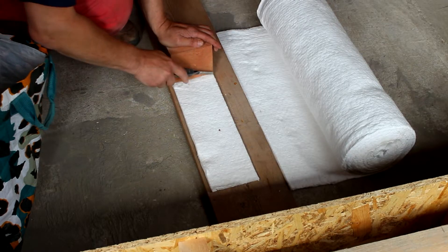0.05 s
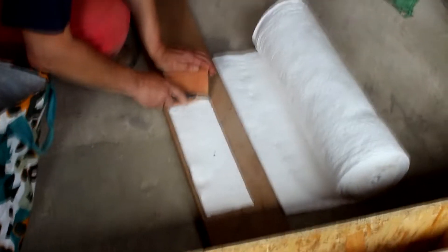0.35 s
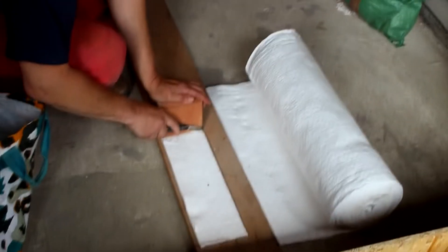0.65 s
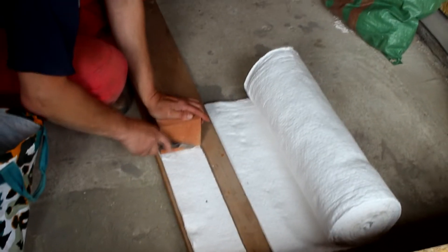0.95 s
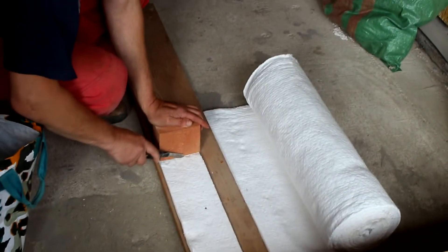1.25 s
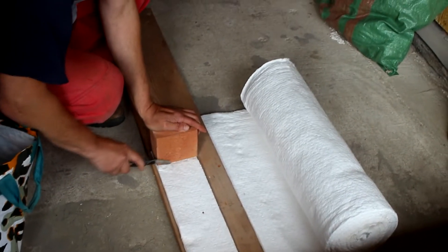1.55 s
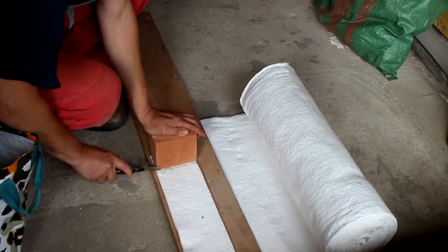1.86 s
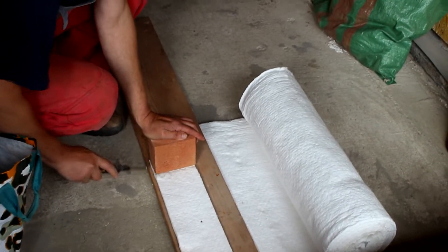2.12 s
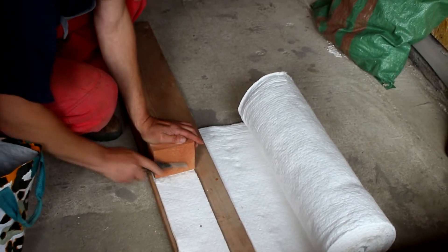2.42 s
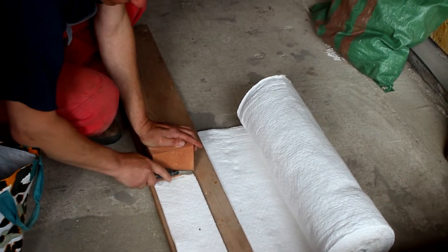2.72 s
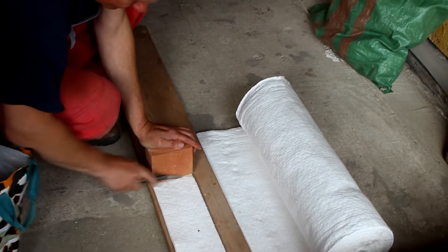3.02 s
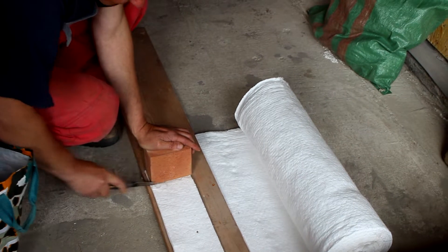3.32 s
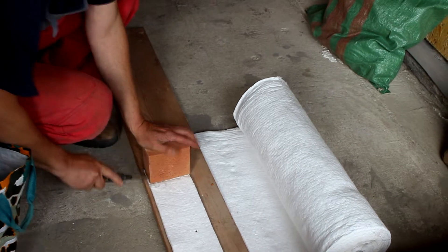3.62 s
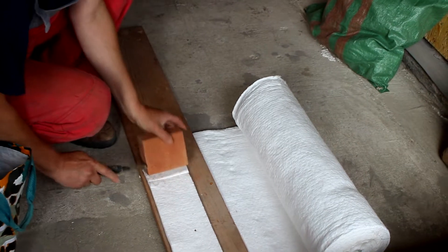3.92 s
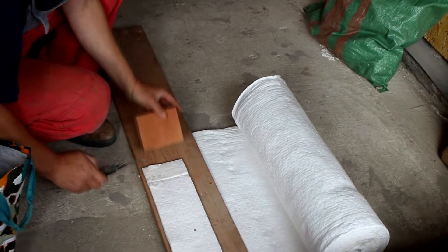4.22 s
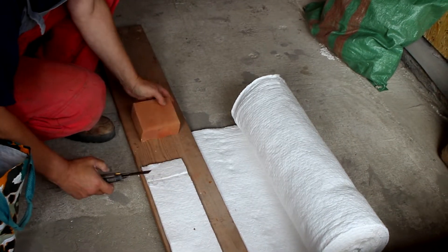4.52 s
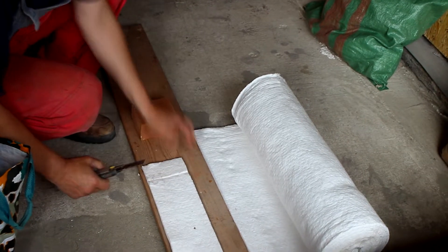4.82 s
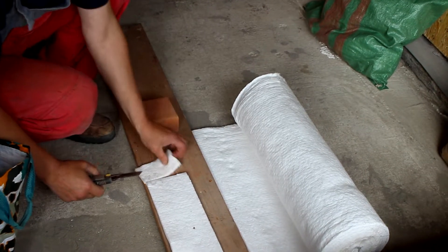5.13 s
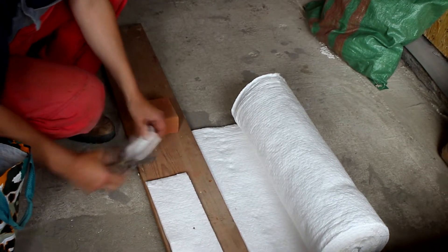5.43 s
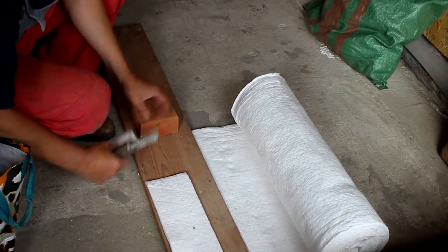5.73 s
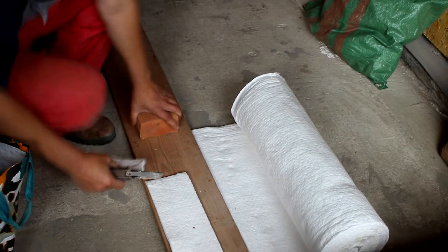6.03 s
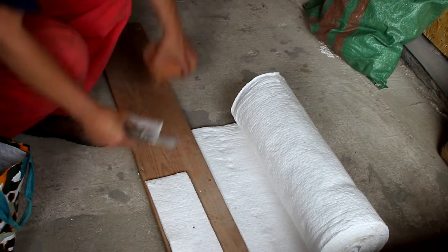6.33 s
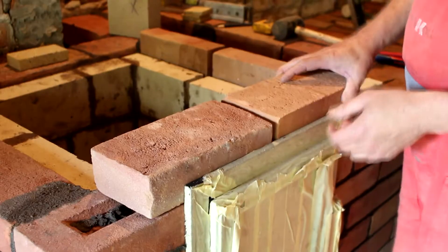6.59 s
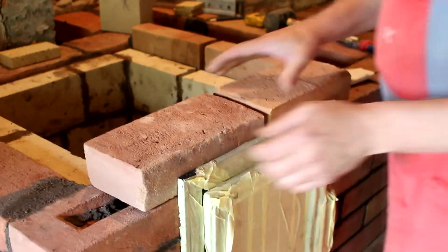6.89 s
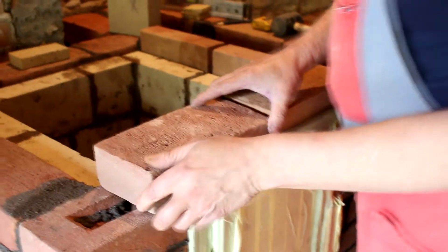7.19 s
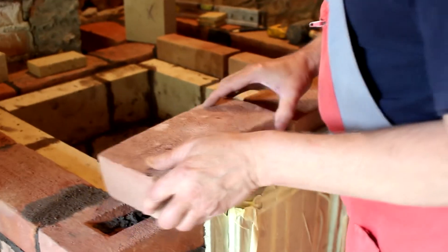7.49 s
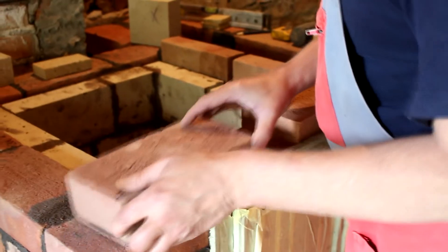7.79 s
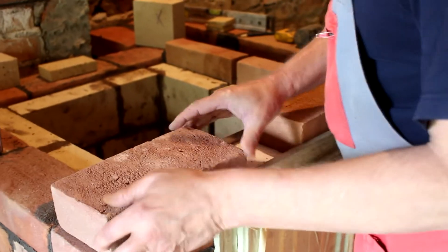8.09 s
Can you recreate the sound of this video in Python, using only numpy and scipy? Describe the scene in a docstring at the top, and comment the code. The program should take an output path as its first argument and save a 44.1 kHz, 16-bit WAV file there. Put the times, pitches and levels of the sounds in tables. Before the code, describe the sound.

Quiet, gritty knife strokes tear through a fibre sheet, close by and a little to the left, with small ticks and thin squeaks where the blade rubs a brick. Then comes one loud, ringing knock of brick on a plank, with a quick rattle. A few faint scrapes follow before louder clay bricks slide over each other, with dull bumps and short clacks in a small room. Faint room noise continues underneath.

```python
"""In a workshop with a concrete floor, a knife saws through fibre insulation along a brick on a plank.
The fibres tear in tiny snaps while the steel blade hisses, scrapes and faintly squeals on the brick.
The brick knocks down on the plank, makes the wood ring and rocks to rest.
Then, in a smaller room, clay bricks grind, clack and bump as they are set on a half-built stove.
Soft room noise runs underneath, with a low rumble in the first second."""
import sys
import numpy as np
from scipy import signal
from scipy.io import wavfile

SR = 44100
rng = np.random.default_rng(int(sys.argv[2]) if len(sys.argv) > 2 else 0)


def store_pcm(level_fs):
    """Save levels as 16-bit WAV."""
    pcm = np.round(np.clip(level_fs, -1, 1) * 32767).astype(np.int16)
    wavfile.write(sys.argv[1], SR, np.atleast_2d(pcm).T)


N = 359415
TIME = np.arange(N) / SR
BINS = np.fft.rfftfreq(4096, 1 / SR)  # the frequencies at which filter curves are drawn
BITE_SHARE = 0.41  # part of each contact over which the pressure builds

# the tones a clay brick rings with: f/Hz, level/dB, t60/s (the time to fade by 60 dB)
BRICK_TONES = [(567, -3.5, 0.025), (704, 2.5, 0.031), (832, -3.5, 0.087), (960, -8, 0.013),
               (1676, -8, 0.13), (1987, -5.5, 0.086), (2220, -12, 0.024), (2746, -3.5, 0.06),
               (3250, -7, 0.16), (3683, 0, 0.059), (4335, 0, 0.04), (4300, -11, .08), (4740, -24, 0.22),
               (5640, -3, 0.19), (6000, -14, .07), (7300, -5, 0.053)]


def gain_of(db):
    """Turns decibels into a factor to multiply by."""
    return 10 ** (np.asarray(db) / 20)


def evened(x):
    """Scales a signal to an average power of 1."""
    return x / np.sqrt(np.mean(x ** 2) + 1e-20)


def read(points, hz=BINS):
    """Joins (frequency, value) points into a curve, with octaves evenly spaced."""
    f, value = np.transpose(points)
    return np.interp(np.log(hz + 1), np.log(f + 1), value)


def add(mix, s, sound):
    """Mixes a sound in, starting at s seconds."""
    part = mix[max(round(s * SR), 0):][:len(sound)]
    part += sound[:len(part)]


def causal(gain):
    """Turns a curve into a filter that never rings ahead of the sound (minimum phase)."""
    log_gain = np.log(np.maximum(np.r_[gain, gain[-2:0:-1]], 1e-5))
    spectrum = np.exp(np.conj(signal.hilbert(log_gain)))
    return np.fft.ifft(spectrum).real[:len(gain)]


def coloured(x, gain):
    """Shapes the tone with a curve; white noise keeps its power."""
    return signal.oaconvolve(x, causal(evened(gain)))[:len(x)]


def peak(hz, width):
    """The curve of one resonance: a hump around hz."""
    return 1 / np.hypot(1, 2 * (BINS - hz) / width)


def radiated(x, low_hz):
    """Cuts the bass: small things push little air below their lowest tone."""
    return signal.sosfilt(signal.butter(4, low_hz, "high", fs=SR, output="sos"), x)


def held(t, attack_s, hold_s, release_s):
    """A level that rises, holds until hold_s, then fades by 60 dB in release_s."""
    return np.clip(t / attack_s, 0, 1) * gain_of(-60 * np.maximum(t - hold_s, 0) / release_s)


def arch(start, length, sag_db):
    """A level that swells to 1 in mid-stroke and is sag_db lower at both ends."""
    return gain_of(-sag_db * np.minimum((2 * (TIME - start) / length - 1) ** 2, 20))


def waver(size, per_s, depth_db):
    """A level that drifts to a new random value per_s times a second."""
    knots = rng.standard_normal(size // 50)
    return gain_of(depth_db * np.interp(TIME[:size] * per_s, np.arange(len(knots)), knots))


def grit(size, per_s, spread_db):
    """A stream of tiny random cracks; spread_db makes their sizes unequal."""
    cracks = rng.random(size) < per_s / SR
    strength = gain_of(spread_db * np.minimum(rng.exponential(1, size), 4))
    direction = np.sign(rng.standard_normal(size))
    return evened(cracks * direction * strength)


def scrapes(rows, colour, release_s, ring_width_hz, per_s, spread_db, catch_db, crumbs_per_s):
    """Each scrape bites, sticks and slips over grains, then fades; where it touches sets the pitch."""
    out, t = np.zeros(N), TIME[:SR // 3]
    for s, length, db, hz, ring_db in rows:
        push = gain_of(db) * held(t, BITE_SHARE * length, length, release_s)
        sand = grit(len(t), per_s, spread_db) * waver(len(t), per_s=228, depth_db=catch_db)
        crumbs = gain_of(-5.5) * grit(len(t), crumbs_per_s, spread_db)
        grains = push * (sand + crumbs)
        grains *= np.linalg.norm(push) / np.linalg.norm(grains)  # the hand's push sets the energy
        ring = np.hypot(1, gain_of(ring_db) * peak(hz, ring_width_hz * np.sqrt(hz / 1000)))
        add(out, s, coloured(grains, colour * ring))
    return out


def blows(rows, tones, scatter, crack_db, crack_t60, travel_s):
    """Each blow rings an object's tones and crushes a little grit; soft blows lack treble."""
    out, t = np.zeros(N), TIME[:SR // 3]
    hz, tone_db, t60 = np.transpose(tones)[:, :, None]
    slowness = np.sqrt(1000 / hz)  # bending waves: the high tones arrive first
    age = np.maximum(t - travel_s * (slowness - slowness.min()), 0)
    for s, db, bright_hz in rows:
        pitch = hz * (1 + scatter * rng.standard_normal(hz.shape))
        ring = (gain_of(tone_db - 60 * age / t60) * np.sin(2 * np.pi * pitch * age)).sum(0)
        crack = gain_of(crack_db - 60 * t / crack_t60) * rng.standard_normal(len(t))
        sound = signal.lfilter(*signal.butter(2, min(bright_hz, SR / 3), fs=SR), ring + crack)
        crest = abs(signal.hilbert(sound)).max()
        add(out, s, gain_of(db) * sound / crest)
    return out


def stereo(mid, side):
    """Makes left and right from what they share (mid) and what sets them apart (side)."""
    # how wide the sound is: f/Hz, side level/dB
    width = [(40, -8.5), (130, -8), (600, -12.5), (1200, -10.5), (2400, -8.5), (4500, -6.5), (8000, -4.5),
             (14000, -5.5)]
    # how far it leans to the left: f/Hz, left over right/dB
    balance = [(60, 3), (250, 1.2), (1000, .6), (3000, 2.2), (6000, 1.6), (14000, 1.8)]
    side = signal.oaconvolve(side, causal(gain_of(read(width))))[:N]
    return np.array([signal.oaconvolve(mid + sign * side, causal(gain_of(sign * read(balance) / 2)))[:N]
                     for sign in (1, -1)])


def reflections(decay, build_s, shorter=1):
    """Random echoes off the walls build up, then fade at each frequency's own speed."""
    echoes = rng.choice([-1., 1.], SR) * (rng.random(SR) < .15)
    hz, t, bands = signal.stft(echoes, SR, nperseg=256)
    fade = gain_of(-60 * t * shorter / read(decay, hz)[:, None])
    tail = signal.istft(bands * fade, SR)[1]
    tail *= np.minimum(TIME[:len(tail)] / build_s, 1)
    return tail / np.linalg.norm(tail)


def room(x, decay, wet_db, build_s, side_db):
    """Adds a room's echoes to a sound; early ones from the sides make it wide."""
    angle = 2 * np.pi * TIME  # two sets of echoes trade places, so the tail has no steady ringing pitch
    tail = sum(signal.oaconvolve(x * share(angle), reflections(decay, build_s))[:N]
               for share in (np.sin, np.cos))
    early = signal.oaconvolve(x, reflections(decay, build_s=0.00047, shorter=2))[:N]
    return stereo(x + gain_of(wet_db) * tail, gain_of(side_db) * early)


def air():
    """Steady room noise from all around, and an uneven low rumble at the start."""
    # the tone of the room noise: f/Hz, level/dB
    noise_colour = [(15, -61), (25, -15.5), (59, -6.5), (107, -8), (129, -7), (289, -2.5), (567, -5),
                    (648, -7.5), (703, -5), (1140, -9), (2060, -12.5), (2230, -13), (3170, -16),
                    (3530, -16), (15500, -32)]
    mid, side = (coloured(rng.standard_normal(N), gain_of(read(noise_colour))) for _ in range(2))
    nudges = held(TIME, attack_s=.01, hold_s=0.89, release_s=.8) * waver(N, per_s=21, depth_db=6.5)
    rumble = np.array([coloured(rng.standard_normal(N), peak(68, 83) ** 3) for _ in range(2)])
    steady = gain_of(-55) * stereo(mid, side * gain_of(7.5))
    return steady + rumble * nudges * gain_of([[-57.5], [-62.5]])


def brick_bumps():
    """A brick lands with a dull bump, first on the plank, later on the stove."""
    # the landings: t/s, level/dB, treble limit/Hz
    bumps = [(4.42, -30, 450), (4.435, -29.5, 700), (4.488, -34, 320), (6.645, -24, 190),
             (6.818, -40.5, 250), (6.96, -33.5, 350), (7.126, -41.5, 300), (7.454, -26.5, 300),
             (7.494, -22, 400), (7.537, -28, 320), (7.648, -17, 340), (7.683, -17, 450), (7.728, -31, 200),
             (7.814, -16.5, 227), (7.865, -17.5, 260), (7.918, -25.5, 260), (8.08, -18.5, 229)]
    # the low tones of what carries the brick: f/Hz, level/dB, t60/s
    support_tones = [(133, -5.5, 0.13), (150, -5, 0.19), (175.7, 6, 0.086), (257, 3.5, 0.1),
                     (313, -1.5, 0.19), (533, -4, 0.082)]
    thuds = blows(bumps, support_tones, scatter=0.048, crack_db=-4, crack_t60=0.039, travel_s=0.0022)
    return radiated(thuds, low_hz=134.4)


def brick_ringing():
    """The curve by which a brick boosts its own tones whenever a grain cracks on it."""
    power = sum((gain_of(8 + db / 2) * peak(hz, 2.2 / t60)) ** 2 for hz, db, t60 in BRICK_TONES)
    return np.sqrt(1 + power)


def brick_drag(start_s=6.99, length_s=0.57, growth_db_per_s=32):
    """Brick grinds over brick, pushed steadily harder until it stops."""
    # the tone of the grinding: f/Hz, level/dB
    drag_colour = [(59, -39), (100, -20), (304, -2), (352, -13), (407, -3.5), (513, -20), (570, -8),
                   (780, -14.5), (942, -12), (1460, -6), (1880, -8.5), (4090, -19), (15000, -37.5)]
    grinding = grit(N, per_s=3500, spread_db=2.5) * waver(N, per_s=70, depth_db=2)
    t = TIME - start_s
    push = gain_of(-57 + growth_db_per_s * np.clip(t, 0, length_s))
    contact = held(t, attack_s=.03, hold_s=length_s, release_s=0.034)
    return push * contact * coloured(grinding, brick_ringing() * gain_of(read(drag_colour)))


def brick_slips():
    """Clay slips over clay in short, gritty bursts."""
    # the slips: t/s, length/s, level/dB, ring f/Hz, ring boost/dB
    slips = [(6.589, 0.021, -30.5, 2230, 15), (6.612, 0.019, -32, 8260, 10), (6.812, 0.0034, -42, 1110, 28),
             (6.962, .012, -40, 1860, 23), (6.986, 0.015, -39.5, 1380, 23.5), (7.331, 0.018, -37, 1580, 19),
             (7.44, 0.028, -35.5, 1690, 19), (7.47, 0.016, -28.5, 520, 30), (7.535, 0.0088, -34.5, 590, 40),
             (7.635, 0.022, -27.5, 2270, 9.5), (7.682, 0.025, -21.5, 3970, 3.5),
             (7.703, 0.013, -24.5, 1730, 23), (7.847, 0.012, -31, 650, 33), (7.914, .006, -36, 3830, 11),
             (7.946, 0.0031, -28, 7250, 12)]
    # the tone of crushed clay grit: f/Hz, level/dB
    clay_grit = [(120, -5.5), (400, 1.5), (750, -11.5), (1200, -2), (1900, -2), (3000, 4.5), (4200, 1),
                 (5500, 1.5), (8000, -3.5), (11000, -8), (16000, -17)]
    return scrapes(slips, brick_ringing() * gain_of(read(clay_grit)), release_s=.15, ring_width_hz=160,
                   per_s=4500, spread_db=2, catch_db=0, crumbs_per_s=200)


def brick_clacks():
    """Bricks hit each other and ring briefly."""
    # the hits: t/s, level/dB, treble limit/Hz
    clacks = [(6.8135, -30, 1750), (6.968, -30.5, 1520), (7.1235, -34.5, 1420), (7.257, -39, 3000),
              (7.334, -28, 2000), (7.66, -20, 900), (7.72, -13.5, 1490), (7.948, -17.5, 1840),
              (8.144, -12, 860)]
    return blows(clacks, BRICK_TONES, scatter=0.017, crack_db=4, crack_t60=0.11, travel_s=0.00195)


def rocking(start_s=4.691, first_gap_s=.041, shrink=0.71, loss_db=3.5, bright_hz=850):
    """Lists the blows of the dropped brick rocking to rest, each sooner and weaker."""
    gaps = first_gap_s * shrink ** np.arange(4)
    times = start_s + np.r_[0, np.cumsum(gaps)]
    return [(s, -9.5 - loss_db * bounce, bright_hz) for bounce, s in enumerate(times)]


def plank_knocks():
    """The brick knocks on the plank and the wood rings."""
    # the knocks: t/s, level/dB, treble limit/Hz
    knocks = [(3.62, -40.5, 890), (3.889, -39.5, 900), (4.227, -41.5, 1000), (4.439, -29.5, 2470),
              (4.494, -29, 2240), (4.506, -31, 2000), (4.548, -35, 885), (4.675, -26, 1000),
              (4.6793, -0.5, 3500), (4.6835, -12.5, 1300), (4.914, -33.5, 1100), (6.106, -36, 3000)]
    # the plank's own tones: f/Hz, level/dB, t60/s
    plank_tones = [(170, -44, 0.13), (256, -25, 0.057), (330, -16, 0.085), (458, -10, 0.1), (638, 3, 0.04),
                   (820, -3.5, 0.083), (978, 1.5, 0.05), (1296, 3, 0.047), (1366, -1.5, 0.045),
                   (1497, -2.5, 0.048), (1760, 4, 0.024), (1916, 5.5, 0.02), (2206, 4.5, 0.011),
                   (2890, -6, 0.021)]
    wood = blows(knocks + rocking(), plank_tones, scatter=.005, crack_db=-5, crack_t60=.03, travel_s=.004)
    return radiated(wood, low_hz=188)


def blade_squeals(width_hz=560, sink_hz_per_s=1000):
    """Rubbing makes the blade sing in fits and starts; the pitch sinks as it is drawn."""
    # the faint squeals: t/s, length/s, starting f/Hz, level/dB
    squeals = [(-.04, 0.086, 9450, -66), (0.739, .48, 8340, -56.5), (1.11, 0.18, 7420, -48.5),
               (1.37, 0.18, 7400, -52), (3.746, 0.12, 9700, -67), (4.552, 0.27, 5150, -57)]
    noise = rng.standard_normal(N) + 1j * rng.standard_normal(N)
    flutter = signal.lfilter(*signal.butter(2, width_hz / 2, fs=SR), noise)
    flutter *= waver(N, per_s=80, depth_db=6)
    out = np.zeros(N)
    for start, length, hz, db in squeals:
        pitch = hz - sink_hz_per_s * np.clip(TIME - start, 0, length)
        tone = (flutter * np.exp(2j * np.pi * np.cumsum(pitch) / SR)).real
        out += gain_of(db) * arch(start, length, sag_db=11) * evened(tone)
    return out


def gritty_scrapes():
    """The blade clicks and scrapes on the brick, and the brick rubs grit on the plank."""
    # the tone of the scraped grit: f/Hz, level/dB
    grit_colour = [(200, -6), (1300, 0), (1900, 8.5), (2800, 10), (4300, 8), (5500, 5.5), (7500, 3),
                   (10000, 1.5), (13000, -11), (16000, -12)]
    # the blade's resonances: f/Hz, width/Hz, level/dB
    resonances = [(2570, 100, 3), (3403, 130, 14), (7450, 940, -4), (9400, 53, 6.5)]
    # the blade or the brick's edge catching on grit: t/s, length/s, level/dB, ring f/Hz, ring boost/dB
    catches = [ (.294, 0.014, -38.5, 2480, 11.5), (.373, 0.04, -36.5, 2600, 12),
               (.595, .002, -39, 2850, 12), (.62, .002, -40, 3000, -5), (.96, 0.032, -46.5, 2360, 19),
               (1.086, 0.02, -43.5, 2470, 24), (1.63, 0.028, -45.5, 3140, 7), (2.167, .005, -41.5, 2950, 9),
               (2.714, 0.0088, -36, 2570, 24), (2.718, 0.0059, -37.5, 3430, 20),
               (2.779, 0.014, -35.5, 3180, 20), (2.924, 0.0035, -38, 2350, 8),
               (3.02, 0.024, -41.5, 3100, 22), (3.066, 0.017, -32.5, 3100, 12),
               (3.173, 0.014, -32, 7260, 15), (3.181, .006, -35, 3430, 16), (3.22, 0.0073, -31.5, 3260, 8),
               (3.225, 0.045, -47, 1140, 24), (3.556, .003, -49.5, 3600, 5),
               (3.768, 0.055, -46.5, 2880, 10), (3.826, 0.038, -40.5, 3800, 12.5),
               (4.007, 0.0056, -46, 2840, 13), (4.424, 0.036, -46.5, 2400, 15),
               (4.491, 0.026, -43.5, 2330, 12), (4.598, 0.039, -43.5, 2090, 15.5),
               (4.718, 0.031, -45.5, 4900, 3), (5.405, 0.0027, -38, 3100, 0), (5.738, .02, -51, 2900, 9),
               (6.096, 0.021, -45, 1940, 18.5), (6.146, 0.019, -46.5, 1400, 25)]
    # flicks that let the blade ring freely: t/s, level/dB, treble limit/Hz
    flicks = [(.296, -31, 11000), (.596, -32, 4000), (2.715, -25.5, 9000), (2.787, -26.5, 7000),
              (3.772, -37, 12000), (3.83, -30, 11030), (4.009, -42, 10100)]
    # the tones of that free ringing: f/Hz, level/dB, t60/s
    steel_tones = [(2670, 9, 0.027), (2920, -19, 0.04), (3670, -6, 0.043), (4600, 0, .04), (7700, -15, .05),
                   (9600, -12, 0.26)]
    ring_power = sum((gain_of(db) * peak(hz, width)) ** 2 for hz, width, db in resonances)
    colour = np.sqrt(gain_of(read(grit_colour)) ** 2 + ring_power)
    clicks = blows(flicks, steel_tones, scatter=.001, crack_db=-5, crack_t60=0.012, travel_s=0.0011)
    return clicks + scrapes(catches, colour, release_s=0.072, ring_width_hz=236,
                            per_s=8500, spread_db=0.2, catch_db=3, crumbs_per_s=160)


def sawing(tug_s=0.018):
    """Fibres tear in clumps under the knife while its edge hisses along the brick."""
    # the knife strokes: t/s, length/s, tearing level/dB, hiss level/dB
    strokes = [(-.16, 0.32, -52, -54), (0.203, 0.42, -64, -52), (.7, .85, -50, -45.5),
               (1.32, 0.37, -52.5, -45.5), (1.537, 0.7, -52, -48.5), (2.891, 0.46, -44.5, -44.5),
               (3.334, 0.16, -45.5, -51.5)]
    # tough clumps giving way: t/s, level/dB
    clumps = [(.295, -53.5), (1.263, -48.5), (2.065, -44.5), (2.159, -46.5), (3.154, -40), (3.412, -44)]
    # the tone of tearing fibres: f/Hz, level/dB
    tearing = [(150, -30), (400, -12.5), (600, -9), (900, -3.5), (1400, -9), (2300, -23.5), (4000, -12),
               (9000, -36)]
    # the tone of the edge on the brick: f/Hz, level/dB
    edge = [(900, -32), (1800, -1), (2500, 3.5), (3300, 0.5), (4500, -5.5), (6500, -6.5), (9000, -10),
            (12000, -16.5), (16000, -34)]
    tear_level = edge_level = 0
    for start, length, tear_db, edge_db in strokes:
        pressure = arch(start, length, sag_db=17)  # the hand presses hardest in mid-stroke
        tear_level = np.hypot(tear_level, gain_of(tear_db) * pressure)
        edge_level = np.hypot(edge_level, gain_of(edge_db) * pressure)
    tugs = sum(gain_of(db) * held(TIME - s, BITE_SHARE * tug_s, tug_s, release_s=0.13) for s, db in clumps)
    tear_colour, edge_colour = gain_of(read(tearing)), gain_of(read(edge))
    plank_ring = np.hypot(1, gain_of(8) * peak(hz=620, width=490))  # each tug sounds the plank below
    fibres = gain_of(-3) * grit(N, per_s=2500, spread_db=3.5)
    hiss = gain_of(-2.5) * coloured(grit(N, per_s=5000, spread_db=2), edge_colour)
    snaps = gain_of(-12) * coloured(grit(N, per_s=130, spread_db=2.5), edge_colour)  # single fibres
    out = tear_level * coloured(fibres, tear_colour)
    out += tugs * coloured(fibres, tear_colour * plank_ring)
    out += edge_level * (hiss + snaps)
    return out * waver(N, per_s=60, depth_db=2)


def scene():
    """The cutting in the workshop, then the bricklaying in the smaller room."""
    # how long the workshop echoes: f/Hz, t60/s
    workshop = [(150, 0.34), (500, 0.3), (1000, 0.39), (2000, 0.25), (4000, 0.33), (12000, 0.24)]
    # how long the room with the stove echoes: f/Hz, t60/s
    stove_room = [(150, 0.32), (600, 0.66), (2000, 0.7), (5000, 0.49), (12000, 0.35)]
    cutting = sawing() + blade_squeals() + gritty_scrapes()
    knife = room(cutting, workshop, wet_db=-7, build_s=0.0084, side_db=-0.5)
    knife *= gain_of([[.4], [-.4]])  # a little to the left
    plank = room(plank_knocks(), workshop, wet_db=-7.5, build_s=0.068, side_db=-3)
    bumps = room(brick_bumps(), stove_room, wet_db=-5, build_s=0.017, side_db=-15)
    clay = radiated(brick_drag() + brick_slips() + brick_clacks(), low_hz=113)
    bricks = room(clay, stove_room, wet_db=-8, build_s=0.0027, side_db=-2)
    return knife + plank + bumps + bricks + air()


def record(dry, top_hz=15900):
    """Flattens any peak past full scale, then removes the highest treble."""
    treble_cut = signal.firwin(511, top_hz, window=("kaiser", 9), fs=SR)
    return signal.oaconvolve(np.clip(dry, -1, 1), treble_cut[None], "same")


dry = scene()
out = record(dry)
store_pcm(out)
```